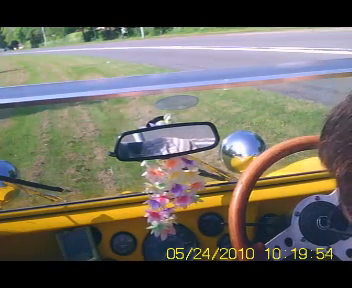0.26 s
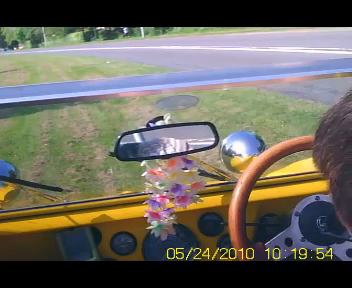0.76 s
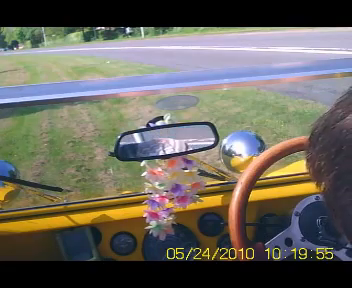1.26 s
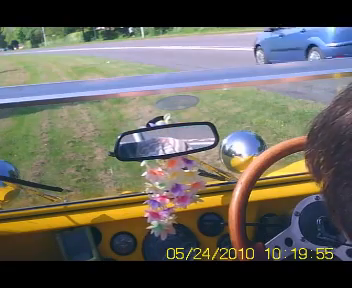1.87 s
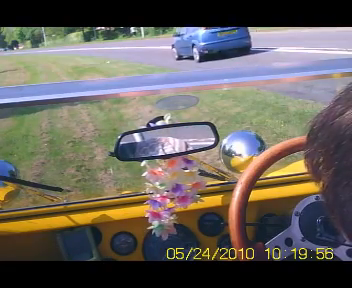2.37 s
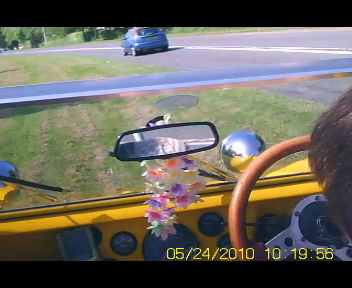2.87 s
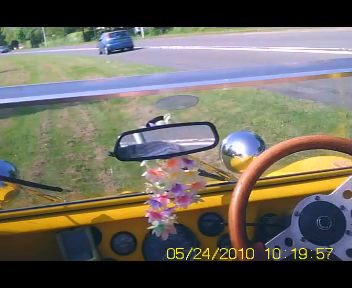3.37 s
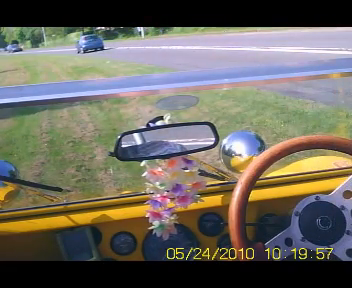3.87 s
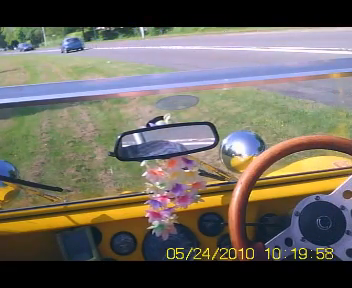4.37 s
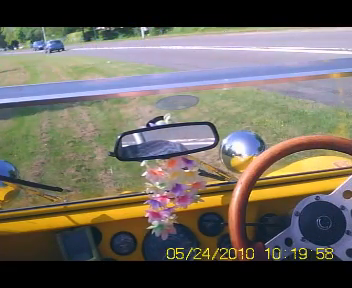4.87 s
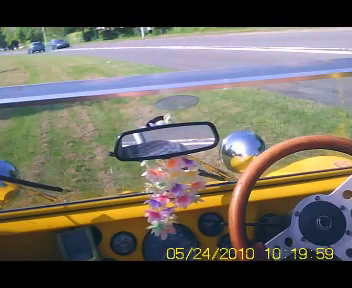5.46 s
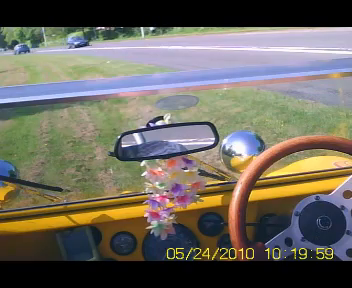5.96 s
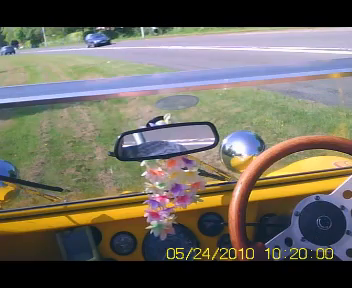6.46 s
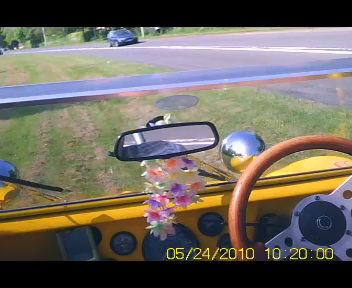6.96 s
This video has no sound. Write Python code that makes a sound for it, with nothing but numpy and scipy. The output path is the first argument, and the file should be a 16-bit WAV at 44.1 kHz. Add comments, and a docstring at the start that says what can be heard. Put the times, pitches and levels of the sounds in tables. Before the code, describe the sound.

A microphone in an open car's cockpit is dominated by low exhaust boom. The engine starts with a short grind and ticking, then throbs irregularly under low air buffeting and a faint intake whistle. Tyres hiss past outside. A single hard rev climbs quickly, rattling trim and heat shield; the departing car's engine note shows faintly as the revs sink to a quieter, uneven idle.

```python
"""An open buggy's four-cylinder engine catches, idles with misfires, is blipped once and sinks back to idle.
The microphone sits in the cockpit, so the exhaust boom, a sum of three firing orders, dominates.
Pulsing noises from the engine, a chassis hum and buffeting air lie around it; starter gear and loose trim
are short noise bursts through resonances. On the road a car passes: hiss that swells, then its engine note."""
import sys
import numpy as np
from scipy import signal
from scipy.io import wavfile
from scipy.ndimage import uniform_filter1d

SR = 44100
rng = np.random.default_rng(int(sys.argv[2]) if len(sys.argv) > 2 else 0)


def put_to_file(sound):
    """Save the sound as 16-bit audio at rate SR, in the file named by the first command-line argument."""
    columns = np.atleast_2d(sound).T  # one column per channel
    safe = np.clip(columns, -1, 1)
    whole_steps = np.round(safe * 32767)
    wavfile.write(sys.argv[1], SR, whole_steps.astype(np.int16))


N = 317961
T = np.arange(N) / SR  # s

# missed firings: start_s, share of the boom that drops out (0-1)
MISSED_FIRINGS = [(0.575, 0.4), (0.769, 0.37), (0.948, 0.32), (1.088, 0.56), (1.28, .65), (1.458, 0.32),
                  (1.656, 0.99), (1.87, 0.83), (2.057, .8), (3.392, 0.49), (3.469, 0.5), (3.862, 0.6),
                  (4.1, 0.36), (4.237, 0.95), (4.404, 0.69), (4.696, 0.5), (4.877, 0.69), (4.947, 0.6),
                  (5.25, 0.9), (5.43, 0.5), (5.621, 0.92), (5.818, .75), (6.114, 0.62), (6.389, 0.5),
                  (7.157, 0.2)]
# throttle and exhaust: start_s, opening (0-1), boom_level_db
THROTTLE_MOVES = [(0, 0.65, -9.5), (.08, 0.98, 0), (.18, 0.83, -3), (.4, 0.71, -2.5), (1, 0.41, 0),
                  (2.17, 0.52, 0.5), (2.235, 0.81, -1), (2.255, 0.86, -0.5), (2.33, 0.86, 4.5),
                  (2.38, 0.7, 2.5), (2.44, 0.71, -0.5), (2.5, 0.9, 4), (2.59, .99, -9.5), (2.63, 0.8, -8),
                  (2.68, .62, -13), (2.73, .55, 0), (3.2, 0.49, 0.5), (3.8, 0.32, -0.5), (4.4, 0.19, -7),
                  (5.2, 0.08, -4.5), (6.1, 0.02, -5.5), (6.9, 0.05, -6.5)]
# spectrum of roaring noise, for the engine and the passing car's rumble: frequency_hz, relative_db_per_hz
ROAR_SPECTRUM = [(82, -38.5), (140, -16), (430, -1.5), (700, -12), (900, -11.5), (1270, -25), (2500, -21.5),
                 (3100, -31), (4200, -25), (6000, -36), (7600, -49), (9200, -45.5), (10800, -67.5),
                 (12800, -59.5)]
# resonances of the loose trim: frequency_hz, width_hz, relative_db
TRIM_MODES = [(2050, 1170, 1.5), (4180, 760, 8.5), (4940, 500, 4), (6040, 310, -13), (8870, 1000, -17),
              (11800, 1600, -31)]


def gain_of(db):
    """Decibels to amplitude."""
    return 10 ** (np.asarray(db) / 20)


def evened(x):
    """Scales to rms 1."""
    return x / np.sqrt(np.mean(x ** 2) + 1e-20)


def curves(rows, t=T):
    """Reads every column of a table at the values t of its first column."""
    points, *columns = np.transpose(rows)
    return [np.interp(t, points, column) for column in columns]


def resonate(x, hz, width):
    """Shifts the frequency hz down to zero, smooths, and shifts back."""
    turn = np.exp(2j * np.pi * np.cumsum(hz * np.ones(len(x))) / SR)
    decay = np.exp(-np.pi * width / SR)
    return 2 * (turn * signal.lfilter([1 - decay], [1, -decay], x / turn)).real


def ring(x, modes):
    """Sum of steep resonances, each a resonator applied twice."""
    return sum(gain_of(db) * resonate(resonate(x, hz, width), hz, width) / np.sqrt(width)
               for hz, width, db in modes)


def drift(hz):
    """Random wander below the frequency hz, of rms 1."""
    return evened(signal.sosfilt(signal.butter(2, hz, fs=SR, output="sos"), rng.standard_normal(N)))


def noise(shape, patchy_db):
    """Random short-time spectra with drifting patches, rms 1."""
    frames, hz = N // 512 + 6, np.fft.rfftfreq(2048, 1 / SR)
    real, imaginary, patches = rng.standard_normal((frames, 1025, 3)).T
    patches = uniform_filter1d(patches, size=20, axis=0)  # across frequency
    patches = evened(uniform_filter1d(patches, size=5, axis=1))  # across time
    shape_hz, shape_db = np.transpose(shape)
    colour_db = np.interp(np.log(hz + 1), np.log(shape_hz + 1), shape_db, left=-100)[:, None]
    spectra = (real + 1j * imaginary) * gain_of(colour_db + patchy_db * patches)
    return evened(signal.istft(spectra, nperseg=2048, noverlap=1536)[1][:N])


def burst(mix, start_s, peak_db, length_s, modes):
    """Adds a short puff of noise that starts sharply, dies away and rings a few modes."""
    t = np.arange(round(SR * (2 * length_s + 0.0115))) / SR
    attack = np.minimum(t / (0.4 * length_s), 1)
    puff = rng.standard_normal(len(t)) * np.exp(-(t / length_s) ** 2) * attack
    sound = ring(puff, modes)
    mix[round(start_s * SR):][:len(t)] += gain_of(peak_db) * sound / abs(sound).max()


def speed():
    """Engine speed in firings per second, before any slowing by misfires."""
    # it catches, idles, is blipped, coasts down and picks up at the end: start_s, firing_rate_hz
    driven = [(0.0, 23.5), (0.2, 30.54), (0.5, 39.5), (0.7, 38.95), (1.0, 39.82), (1.55, 39.47),
              (1.8, 40.1), (2.0, 44.97), (2.1, 45.6), (2.2, 50.98), (2.33, 66.1), (2.44, 86.6),
              (2.53, 102.7), (2.6, 112.9), (2.7, 121.6), (2.9, 105.1), (3.1, 92.56), (3.38, 78.2),
              (3.6, 68.9), (3.8, 63.4), (4.1, 56.87), (4.3, 52.9), (4.5, 48.9), (4.65, 47.55), (4.93, 42.9),
              (5.4, 39.8), (6.0, 37.04), (7.0, 36), (7.21, 41)]
    return curves(driven)[0]


def follow(idle_db, octave_db, open_db):
    """Gain of a layer: level at idle, rise per octave of engine speed, rise at full throttle (dB)."""
    octaves = np.maximum(np.log2(speed() / 38), 0)  # above a 38 Hz idle
    throttle = np.clip(curves(THROTTLE_MOVES)[0], 0, 1)
    return gain_of(idle_db + octave_db * octaves + open_db * throttle)


def crank():
    """Counts firings by integrating engine speed, which sags after each misfire; also a jittered count."""
    sag = np.zeros(N)
    for start_s, share in MISSED_FIRINGS:
        sag += share * np.exp(-((T - start_s - .03) / 0.044) ** 2)  # deepest 30 ms later
    firings = .45 + np.cumsum(speed() * (1 - .05 * sag)) / SR
    return firings, firings + 0.0027 * drift(hz=4.0)


def exhaust_boom(firings, unsteady):
    """Three firing orders whose strengths follow speed and throttle, with unequal cylinders and misfires."""
    # exhaust orders against speed: firing_rate_hz, first_order_db, second_order_db, third_order_db
    orders_at = [(24.5, -12, -22, -38.5), (26.4, -19, -23, -39), (32, -19, -21, -45),
                 (36.2, -21.5, -15, -36.5), (40.09, -21, -17, -37.5), (42, -16.5, -18.5, -39),
                 (45, -19, -18, -46), (47.1, -16, -23.5, -46), (51.6, -18, -31, -51),
                 (55, -15.5, -51, -40.5), (68.3, -15.5, -48, -46.5), (76, -15, -49, -65),
                 (81.4, -15, -53, -68), (87.9, -12.5, -40, -66), (98.5, -24.5, -49, -59),
                 (106.6, -15.5, -44, -48), (119.6, -19, -41, -63)]
    # gain at full throttle of the first, second and third order (db)
    full_throttle_db = [3, 6.5, 21.5]
    # strength of the four firings in turn (db), before the unevenness factor
    cylinder_strength_db = [-0.34, -0.12, -0.68, -0.95]
    # how strongly the cylinders differ: start_s, factor
    unevenness = [(0, 3.7), (.5, 0.96), (2.2, 0.98), (3.9, 2.7), (4.8, 2.3), (5.1, 0.57), (7.21, 0.49)]
    catch_s, catching_db = 0.23, [-6, 9.5, 8.5]  # change of each order as the engine catches, time constant
    missed_s = 0.043  # width of each gap

    throttle, boom_db = curves(THROTTLE_MOVES)
    opening = np.clip(throttle, 0, 1) ** 2.45
    boom = np.zeros(N)
    orders = zip(curves(orders_at, speed()), full_throttle_db, catching_db)
    for k, (order_db, open_db, catch_db) in enumerate(orders):
        level_db = order_db + boom_db + open_db * opening + catch_db * np.exp(-T / catch_s)
        phase = 2 * np.pi * (k + 1) * unsteady - 0.67 * k + 0.12 * k ** 2 * drift(hz=12)
        boom += gain_of(level_db + drift(hz=6.6)) * np.cos(phase)
    fired = np.ones(N)
    for start_s, share in MISSED_FIRINGS:
        fired *= 1 - np.clip(share, 0, 1) * np.exp(-(2 * (T - start_s) / missed_s) ** 2)
    cylinder_db = np.array(cylinder_strength_db)[firings.astype(int) % 4]
    cylinder_db = uniform_filter1d(cylinder_db, size=600) * curves(unevenness)[0]
    return np.sqrt(2) * boom * fired * gain_of(cylinder_db)


def engine_beats(firings, unsteady):
    """Tones at half, one and a half and five times the firing rate: shake, uneven lope and a faint rap."""
    # uneven beat at one and a half orders: start_s, level_db
    lope_level = [(0, -40), (3.4, -38), (4.05, -27), (4.3, -24), (4.55, -26), (4.9, -29), (5.1, -42),
                  (7.21, -42)]
    # fifth firing order, a faint rap: start_s, level_db
    rap_level = [(0, -49), (2.2, -47), (2.5, -63), (3.8, -59), (4.1, -49), (4.6, -47), (4.9, -58),
                 (5.6, -52), (7.21, -54.5)]
    shake = np.sqrt(2) * follow(-47.5, 14, -10.5) * gain_of(3. * drift(hz=5.9)) * np.cos(np.pi * unsteady)
    lope = gain_of(curves(lope_level)[0] + 2. * drift(hz=5)) * np.cos(3 * np.pi * unsteady)
    rap = gain_of(curves(rap_level)[0] + 2. * drift(hz=2.5)) * np.cos(2 * np.pi * 5 * firings)
    return shake + lope + rap


def fan_and_roar(throb):
    """Broad noises that swell with each firing and grow with speed and throttle."""
    # fan noise: frequency_hz, relative_db_per_hz
    fan_spectrum = [(82, -36.5), (140, 7), (200, -8.5), (380, -4.5), (515, -6.5), (723, -4), (1370, -13.5),
                    (1700, -8), (2400, -17.5), (2800, -19.5), (4500, -24.5), (5000, -31.5), (8000, -37),
                    (12800, -50.5)]
    fan = evened(noise(fan_spectrum, patchy_db=1.58) * (1 + 0.8 * throb))
    roar = evened(noise(ROAR_SPECTRUM, patchy_db=2.0) * (1 + 0.11 * throb))
    return follow(-42.5, 0.41, 12) * fan + follow(-51.5, 12, 6.7) * roar


def intake_whistle(firings):
    """A wavering tone from the intake, throbbing with one intake stroke a firing."""
    # start_s, pitch_hz, level_db
    whistle_path = [(0, 1597, -45), (.5, 1710, -43), (1.7, 1682, -42), (2.3, 1667, -50.5), (3.9, 1660, -66),
                    (4.0, 1675, -44.5), (4.43, 1523, -48), (4.67, 1477, -66), (5.15, 1730, -52.5),
                    (5.9, 1704, -45.5), (6.2, 1580, -53.5), (6.35, 1645, -50), (7.21, 1655, -49)]
    whistle_hz, whistle_db = curves(whistle_path)
    gulps = (.25 + np.sin(np.pi * firings) ** 2) * gain_of(3 * drift(hz=15))
    tone = np.cos(2 * np.pi * (np.cumsum(whistle_hz) / SR + .17 * drift(hz=30)))
    return gain_of(whistle_db) * evened(gulps * tone)


def valve_and_casing(firings, throb):
    """One loud valve ticks once every four firings; noise pulsing with the firings rings the engine casing."""
    # engine casing resonances: frequency_hz, width_hz, relative_db
    casing_modes = [(2023, 87, 1.5), (2270, 100, 4), (3276, 630, 0), (4200, 130, -17)]
    tick = rng.standard_normal(N) * np.exp(-((firings / 4 + .3) % 1) / .09)
    tappet = evened(ring(tick, [(3600, 2500, 0)]))
    casing = evened(ring(rng.standard_normal(N) * (0.12 + throb), casing_modes))
    return follow(-66.5, 3.3, 10) * tappet + follow(-56, .5, 10) * casing


def exhaust_growl(firings, throb):
    """Sharp firing blows and pulsing noise ring the exhaust pipe, whose upper modes gain with speed."""
    # exhaust pipe resonances before the gain with speed: frequency_hz, width_hz, relative_db
    pipe_modes = [(165, 70, -4), (225, 90, 0), (330, 80, -3), (430, 90, -1)]
    # start_s, level_db
    growl_level = [(0, -30.5), (.4, -41.5), (1, -48.5), (2.15, -40.5), (2.235, -33), (2.255, -32),
                   (2.33, -24), (2.375, -32.5), (2.44, -25.5), (2.5, -26), (2.585, -24), (2.63, -33),
                   (2.75, -39.5), (3.2, -43), (3.8, -49), (5, -57.5), (7.21, -52)]
    bark_share, bark_spread_db = .55, 5  # weight of the blows in the growl, and how much they differ
    opens_db, full_hz = 6, 100  # gain per octave of pitch and of speed; no tilt at this firing rate

    opening = opens_db * np.log2(np.clip(speed() / full_hz, .55, 1.1))
    pipe = [(hz, width, db + opening * np.log2(hz / pipe_modes[1][0])) for hz, width, db in pipe_modes]
    blows = np.diff(np.floor(firings), prepend=0) * gain_of(bark_spread_db * rng.standard_normal(N))
    bark = evened(ring(blows, pipe))
    rush = evened(ring(rng.standard_normal(N) * (0.32 + throb), pipe))
    growl = evened(bark_share * bark + (1 - bark_share) * rush)
    return gain_of(curves(growl_level)[0]) * growl


def buggy():
    """The engine: every layer is driven by one count of firings."""
    firings, unsteady = crank()
    throb = np.exp(-(firings % 1) / 0.62)  # pressure pulse after each firing
    tones = exhaust_boom(firings, unsteady) + engine_beats(firings, unsteady)
    noises = fan_and_roar(throb) + valve_and_casing(firings, throb) + exhaust_growl(firings, throb)
    return tones + noises + intake_whistle(firings)


def chassis_hum():
    """A low hum, wavering around the chassis's own frequency, with a level set by speed and throttle."""
    chassis_hz = 28.2
    phase = 2 * np.pi * (chassis_hz * T + 0.037 * drift(hz=6.9))
    return np.sqrt(2) * follow(-30, -10.5, 12) * gain_of(1.3 * drift(hz=7.8)) * np.cos(phase)


def buffeting():
    """Low, patchy noise of air around the cockpit."""
    # frequency_hz, relative_db_per_hz
    buffet_spectrum = [(4, -20), (12, -10.5), (30, 3), (50, 9.5), (75, 4.5), (100, 3.5), (125, -15),
                       (150, -28.5), (200, -73)]
    # start_s, level_db
    buffet_level = [(0, -31), (.2, -15.5), (.7, -27), (1.5, -24), (1.9, -29), (2.3, -22.5), (3.6, -26),
                    (4.6, -30), (5.2, -34), (6, -35), (6.9, -36)]
    return gain_of(curves(buffet_level)[0]) * noise(buffet_spectrum, patchy_db=3.0)


def road():
    """Far traffic hisses steadily; the passing car's tyres and rumble swell as its distance shrinks."""
    # tyre hiss: frequency_hz, relative_db_per_hz
    tyre_spectrum = [(100, -34), (150, -0.5), (280, 0), (515, -4), (1080, 5.5), (1570, -2.5), (2040, -11.5),
                     (2330, -10.5), (2920, -21), (4200, -25), (4900, -47.5), (6100, -26.5), (7300, -43),
                     (12800, -67.5)]
    # hiss on the bend: frequency_hz, width_hz, relative_db
    turn_modes = [(1382, 380, 0)]
    pass_s, pass_m = 1.245, 3.33  # time and distance when nearest
    coming_m_per_s, leaving_m_per_s = 8.6, 9.9
    tyres_db, rumble_db, far_traffic_db = -26.5, -39.5, -57  # first two when nearest
    turn_s, turn_length_s, turn_db = 1.83, 0.22, -36.5  # swell of hiss as the car swings round the bend

    along_m = np.where(T < pass_s, coming_m_per_s, leaving_m_per_s) * (T - pass_s)
    near = pass_m / np.hypot(pass_m, along_m)  # 1 when nearest
    hiss = (gain_of(tyres_db) * near ** 1.27 + gain_of(far_traffic_db)) * noise(tyre_spectrum, patchy_db=1.54)
    rumble = gain_of(rumble_db) * near ** 2 * noise(ROAR_SPECTRUM, patchy_db=3.5)
    swell = gain_of(turn_db) * np.exp(-((T - turn_s) / turn_length_s) ** 2)
    return hiss + rumble + swell * evened(ring(rng.standard_normal(N), turn_modes))


def starter_gear():
    """The starter gear grinds free: noise bursts ring the gear."""
    # start_s, peak_db, length_s
    grinds = [(0.076, -16, 0.018), (0.103, -17.5, 0.014), (0.148, -18.5, 0.016), (0.191, -22, 0.017)]
    # frequency_hz, width_hz, relative_db
    gear_modes = [(1750, 590, 2.5), (3540, 320, -5), (6320, 370, -19), (9000, 180, -30)]
    mix = np.zeros(N)
    for start_s, peak_db, length_s in grinds:
        burst(mix, start_s, peak_db, length_s, gear_modes)
    return mix


def trim_ticks():
    """Loose trim ticks: very short bursts ring its modes, each with its own brightness."""
    # start_s, peak_db, brightness_db_per_octave
    rattles = [(0.086, -19, -9), (0.09, -25, 1), (0.0974, -31, 5), (0.109, -30, -2), (0.1204, -21, -4),
               (0.1385, -20, -5), (0.148, -32, -1), (0.156, -32, -2), (0.163, -28, 2), (0.184, -14, -3),
               (0.1867, -21, -2), (0.2014, -23, -4), (0.2125, -28, -2), (0.2333, -25, -4), (0.252, -32, 0),
               (0.2856, -29, -4), (0.3075, -28, 0), (0.341, -33, -2), (0.3635, -23, 4), (0.3974, -34, 5),
               (1.4505, -25, -3), (2.318, -36, 10), (2.3323, -30, 10), (2.3582, -38, 5), (2.3821, -34, 8),
               (2.4006, -27, 2), (2.4076, -25, 0), (2.413, -27, 4), (2.4394, -28, 3), (2.4635, -22, 2),
               (2.484, -33, -3), (2.4894, -29, 0), (2.503, -34, 5), (2.5188, -23, -6), (2.5383, -23, 0),
               (2.547, -29, 1), (2.5572, -19, -3), (2.569, -30, -8), (2.5967, -24, 0), (2.6086, -22, -3),
               (2.6435, -26, -7), (2.659, -26, -4), (2.694, -30, -4), (3.052, -31, -4), (3.0744, -30, 2),
               (3.1482, -28, -3), (3.162, -26, -1)]
    mix = np.zeros(N)
    for start_s, peak_db, bright in rattles:
        modes = [(hz, width, db + bright * np.log2(hz / TRIM_MODES[1][0])) for hz, width, db in TRIM_MODES]
        burst(mix, start_s, peak_db, 0.0014, modes)
    return mix


def snap_and_squeaks():
    """One broad snap and thin high squeaks, as noise bursts through wide and narrow resonances."""
    # broad snap: frequency_hz, width_hz, relative_db
    snap_modes = [(1600, 1200, 0), (3500, 1800, -2), (5500, 1800, -5)]
    # start_s, peak_db, length_s
    squeaks = [(1.445, -48, 0.012), (2.665, -42, 0.013)]
    # thin squeak: frequency_hz, width_hz, relative_db
    squeak_modes = [(10140, 264, 0), (11700, 300, -2)]
    mix = np.zeros(N)
    burst(mix, 1.445, -24, .010, snap_modes)
    for start_s, peak_db, length_s in squeaks:
        burst(mix, start_s, peak_db, length_s, squeak_modes)
    return mix


def blip_buzz():
    """The blip shakes trim and heat shield into spells of flickering buzz: noise through their resonances."""
    # spells of buzz: peak_s, trim_level_db, heat_shield_level_db
    buzzes = [(2.52, -36.5, -38), (2.68, -40, -45), (2.78, -62, -39), (3.15, -58, -59)]
    # heat shield resonance: frequency_hz, width_hz, relative_db
    shield_modes = [(2560, 260, 0)]
    rise_db_per_s, fall_db_per_s = 149, 170
    trim, shield = np.zeros((2, N))
    for peak_s, trim_db, shield_db in buzzes:
        spell_db = np.minimum(rise_db_per_s * (T - peak_s), fall_db_per_s * (peak_s - T))
        trim += gain_of(trim_db + spell_db)
        shield += gain_of(shield_db + spell_db)
    trim *= gain_of(4.5 * drift(hz=60))
    shield *= gain_of(1.9 * drift(hz=60))
    trim_buzz = trim * evened(ring(rng.standard_normal(N), TRIM_MODES))
    return trim_buzz + shield * evened(ring(rng.standard_normal(N), shield_modes))


def during(rows):
    """1 while a table lasts, fading to 0 over 0.1 s outside it."""
    first_s, last_s = rows[0][0], rows[-1][0]
    return np.interp(T, [first_s - .1, first_s, last_s, last_s + .1], [0, 1, 1, 0])


def car_note():
    """The leaving car's engine: multiples of its crank cycle rise and then fall in pitch."""
    # start_s, crank_cycle_hz, level_db before the order levels
    note_path = [(2.45, 32.9, -52), (2.6, 36.19, -36), (2.75, 39.8, -41.5), (2.88, 42.3, -39),
                 (3, 40.7, -36.5), (3.4, 31.61, -42), (3.9, 24.79, -55.5)]
    # multiple of the crank cycle, relative_db
    car_orders = [(2, -1), (4, -8), (5, -5), (6, 1), (10, -5), (12, -5)]
    cycle_hz, note_db = curves(note_path)
    turns = np.cumsum(cycle_hz) / SR + .005 * drift(hz=14)
    note = sum(gain_of(db + 2.7 * drift(hz=5.7)) * np.cos(2 * np.pi * k * turns) for k, db in car_orders)
    return np.sqrt(2) * during(note_path) * gain_of(note_db) * note


def scene():
    """All sources at one microphone in the cockpit."""
    steady = buggy() + chassis_hum() + buffeting() + road()
    small_parts = starter_gear() + trim_ticks() + snap_and_squeaks() + blip_buzz()
    return (steady + small_parts + car_note())[None]


def record(dry):
    """The band limit, then a small constant offset of the converter."""
    edge = signal.firwin(1023, 12780, window=("kaiser", 10), fs=SR)  # low-pass at 12780 Hz
    return signal.oaconvolve(dry, edge[None], "same") - .0093


dry = scene()
out = record(dry)
put_to_file(out)
```